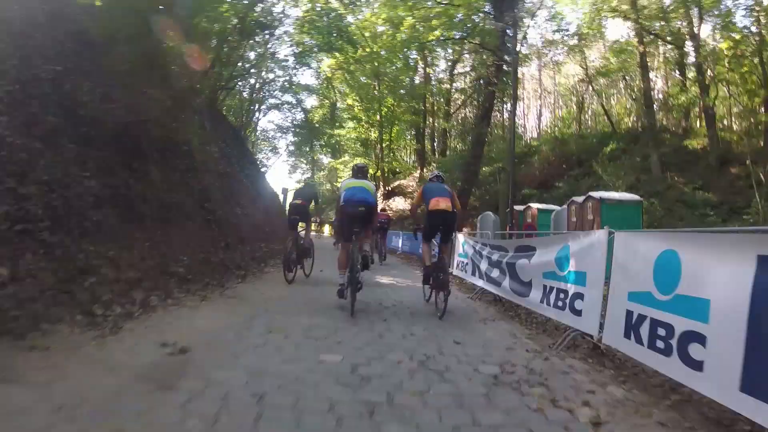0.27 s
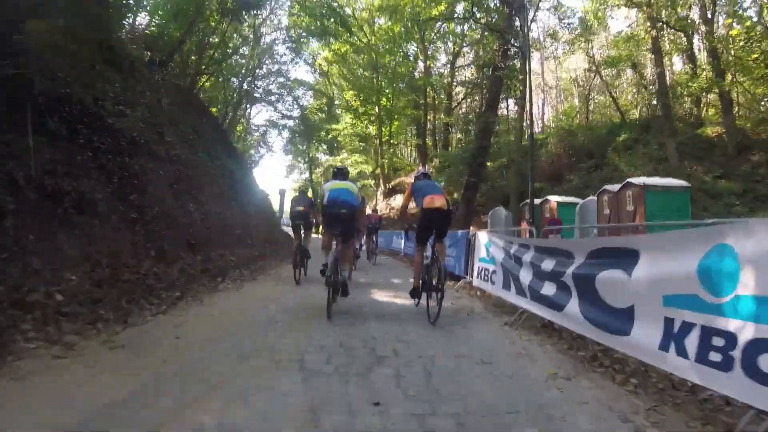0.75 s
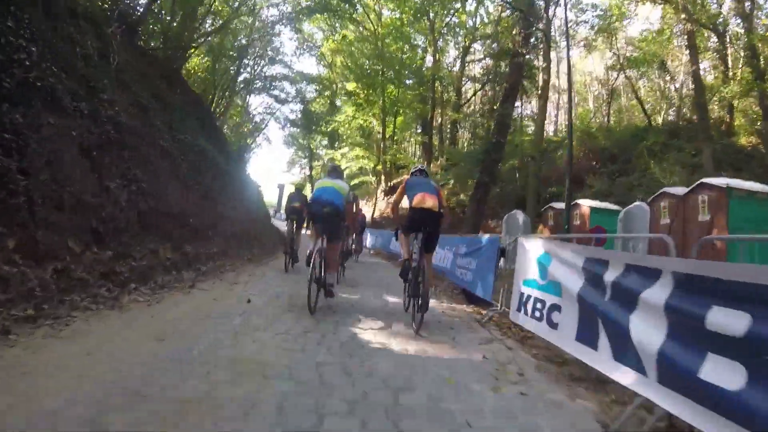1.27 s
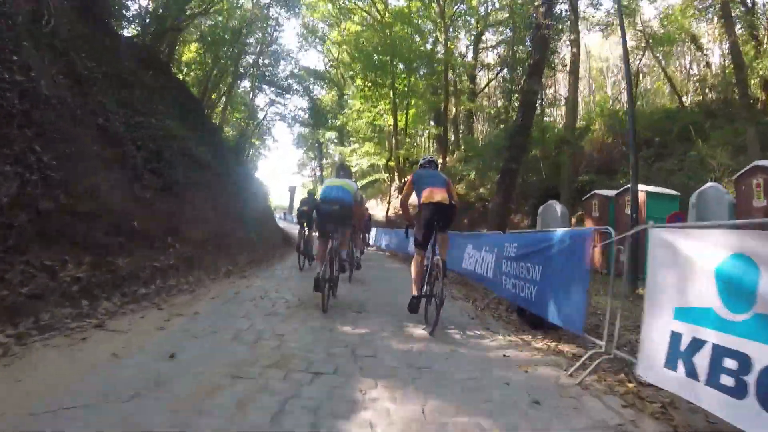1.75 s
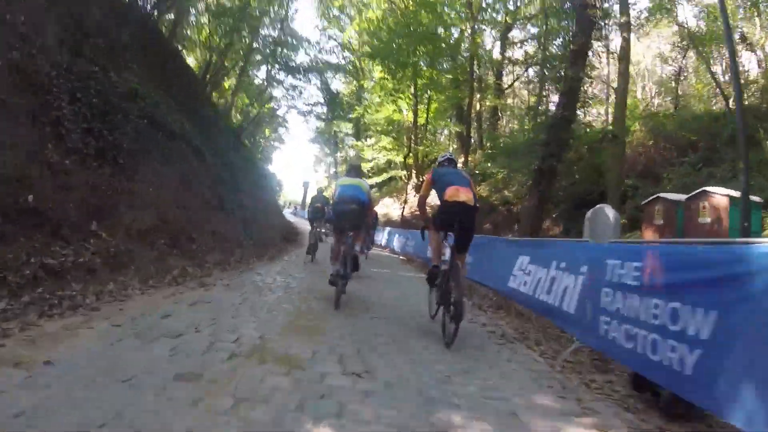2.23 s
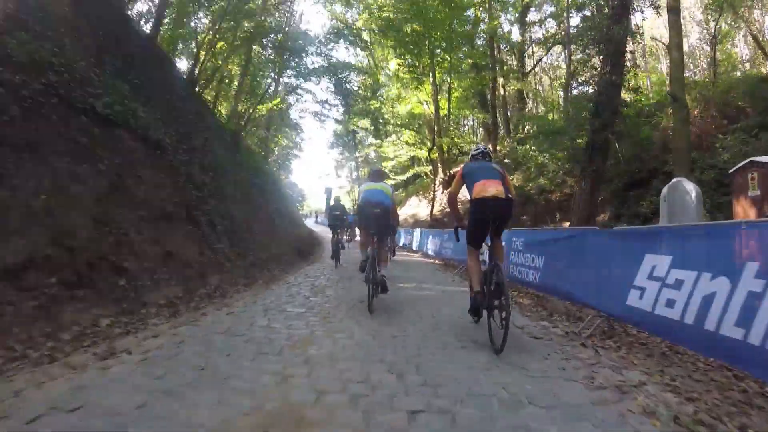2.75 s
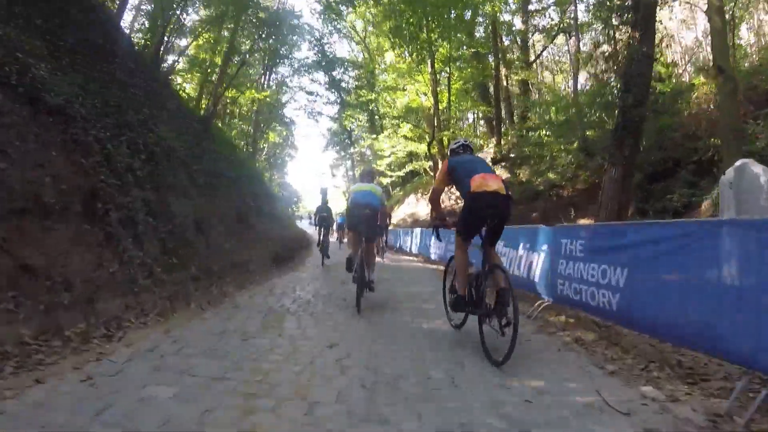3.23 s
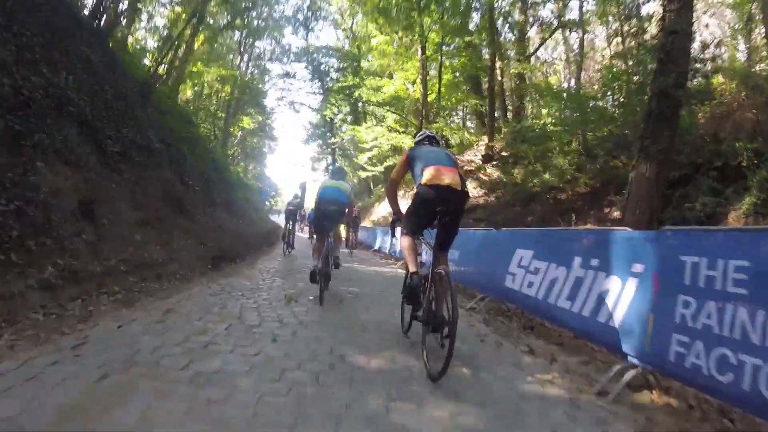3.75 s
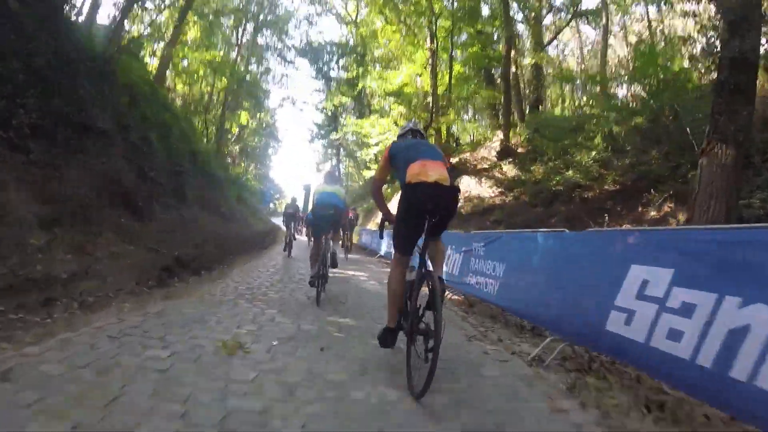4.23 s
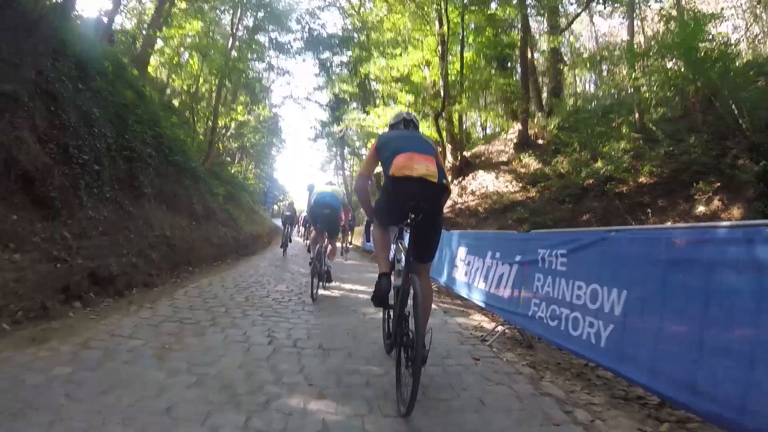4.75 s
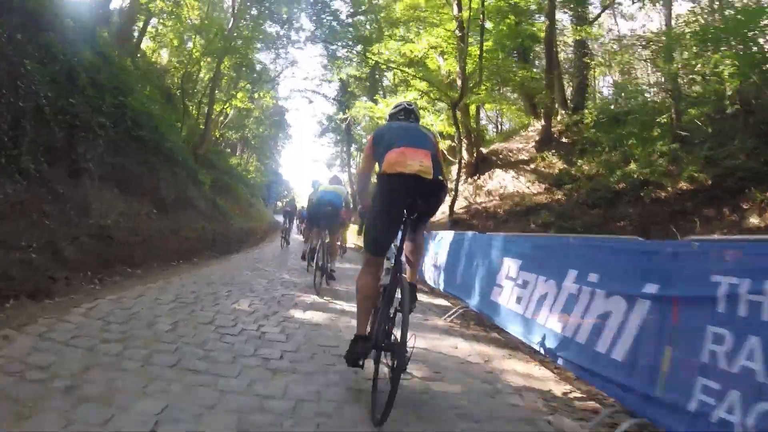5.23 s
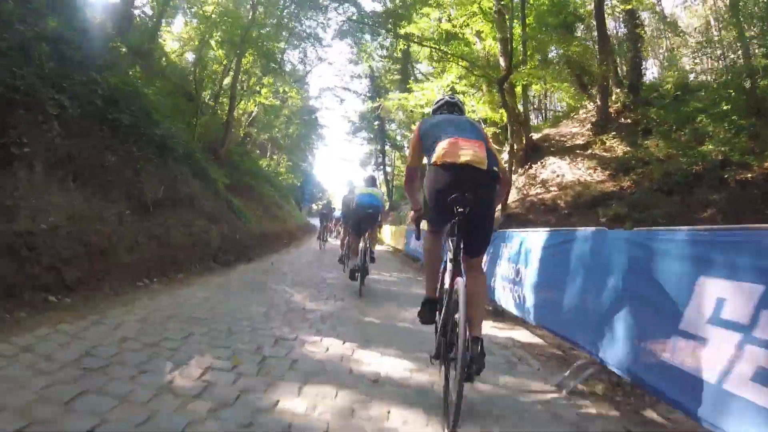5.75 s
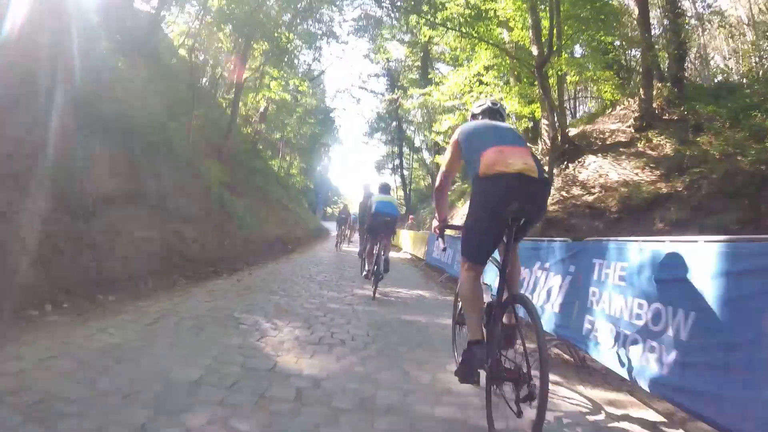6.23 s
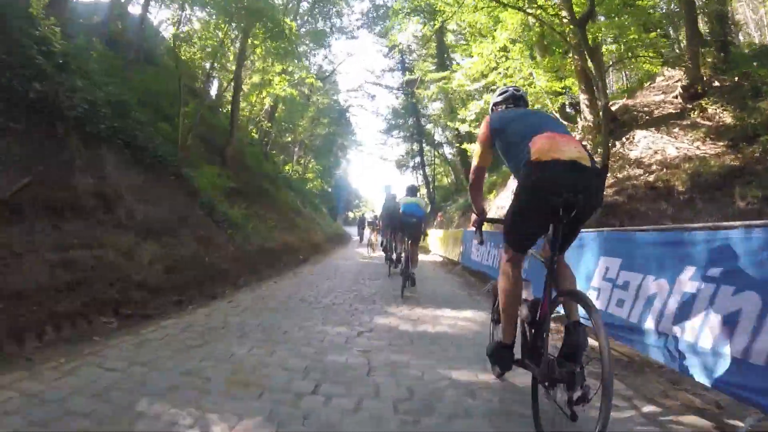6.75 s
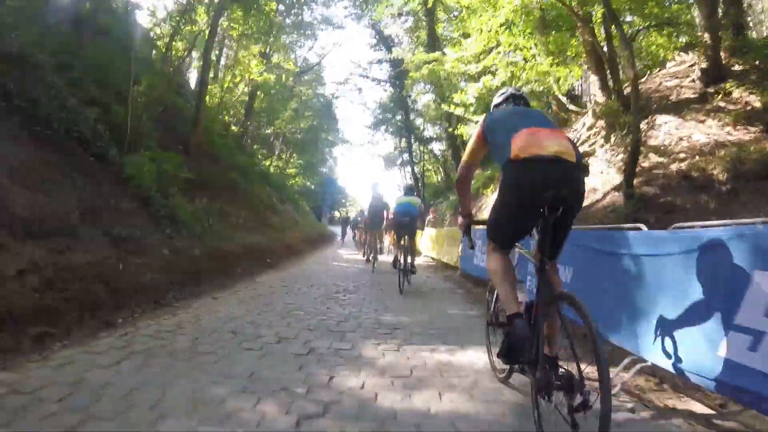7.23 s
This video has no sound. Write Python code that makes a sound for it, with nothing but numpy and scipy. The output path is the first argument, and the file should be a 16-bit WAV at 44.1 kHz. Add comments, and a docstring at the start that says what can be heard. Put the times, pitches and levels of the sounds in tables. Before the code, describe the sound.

Bicycle tyres roll continuously over uneven cobbles, heard from a small housed microphone clamped to the handlebar. Loud, boomy rumble and irregular thumps dominate as wheels drop into joints. Over it, the housing hums and knocks in its clamp, with dry rattling, faint bright metallic ticks and a soft muffled tyre hiss. Knocks bunch up around the middle and again near the end. Outdoors, very close, no voices.

```python
"""Bicycle on a cobbled lane

A bicycle climbs a cobbled lane; the microphone sits in a small housing clamped to the handlebar.
Stone edges jolt the wheels and shake fork and bar: random jolts ring low resonances.
The housing hums and knocks in its clamp: jolts, ticks and single blows ring higher resonances.
Small contacts rattle, bright jingles and ticks are showers of clicks; the tyres hiss as bands of noise."""
import sys
import numpy as np
from scipy import signal
from scipy.io import wavfile
from scipy.ndimage import uniform_filter1d

SR = 44100
rng = np.random.default_rng(int(sys.argv[2]) if len(sys.argv) > 2 else 0)


def wrap_up_sound(samples):
    """Save the sound to the file named by the first command line argument, as 16-bit audio."""
    columns = np.atleast_2d(samples).T
    # keep every value between -1 and 1, then stretch to whole-number steps
    tamed = np.clip(columns, -1, 1)
    steps = np.round(tamed * 32767).astype(np.int16)
    wavfile.write(sys.argv[1], SR, steps)


N = 329849   # length in samples

# How rough the paving is, given as the hum of the housing: t/s, level/dB
ROUGHNESS = [(0.05, -35.5), (0.32, -38), (0.67, -44), (0.83, -31), (1.04, -39), (1.93, -38.5),
             (2.01, -32.5), (2.77, -38.5), (3.43, -35), (4.2, -41.5), (4.28, -36.5), (4.45, -40.5),
             (5.46, -34.5), (5.5, -38.5), (6.18, -37), (7.46, -38.5)]
# Tyre hiss, how strong the noise is at each pitch, relative: f/Hz, level/dB per Hz
HISS_SPECTRUM = [(560, -9.5), (800, -15), (1300, -25), (1600, -26), (2100, -30), (3200, -31.5), (4100, -36),
                 (6300, -38), (9800, -42)]
# Resonance of the microphone port, heard in the hiss: f/Hz, width/Hz, level/dB
MICROPHONE_PORT = (5185, 1380, 0.93)
# Bright metallic jingles and short treble ticks: t/s, peak level/dB (nominal)
JINGLES = [(0.25, -47.5), (0.388, -46), (0.4, -40), (1.715, -47.5), (2.5718, -46), (2.911, -49.5),
           (2.963, -46), (3.29, -47), (4.217, -47.5), (4.301, -45.5), (4.771, -39), (4.873, -47.5),
           (5.017, -47), (5.158, -43), (5.3882, -48.5), (5.417, -45), (5.75, -44.5), (6.0128, -40.5),
           (6.183, -48), (6.249, -47.5), (6.53, -46), (6.866, -45.5), (6.9142, -45.5), (6.999, -41.5),
           (7.1123, -45), (7.3784, -46)]
# Louder knocks of the housing in its clamp: t/s, nominal ring peak level/dB, tick level over the ring/dB
KNOCKS = [(0.0405, -31, -10), (0.0553, -31, 7), (0.1512, -30, 6), (0.191, -35, 2), (0.252, -30, -2),
          (0.2421, -26, -2), (0.3168, -30.5, 4), (0.3855, -31, 0), (0.7786, -32, 0), (0.8001, -28, -2),
          (0.823, -33, -4), (0.85, -28, 1), (0.871, -33, -4), (0.944, -33, -4), (0.969, -34, 0),
          (0.8602, -26.5, -5.5), (1.0046, -29, 0), (1.066, -28.5, 1), (1.2354, -32, 2), (1.302, -35, 0),
          (1.359, -35, 0), (1.4357, -27, 6), (1.5284, -32, 5), (1.650, -35, 5), (1.753, -34, -3),
          (2.061, -31, -3), (2.109, -31, -2), (2.1392, -33, 3), (2.1958, -31, 2), (2.218, -34, 2),
          (2.251, -28, 2), (2.264, -33, -4), (2.372, -34, 6), (2.501, -34, -3), (2.56, -35, 2),
          (2.6472, -28, 3), (2.7396, -30.5, 5), (3.097, -35, -3), (3.362, -31, 0), (3.4128, -27, 0),
          (3.432, -31, 1), (3.485, -29, -2), (3.537, -34, -1), (3.5827, -24.5, 0.5), (3.6277, -25.5, 7),
          (3.68, -28, 7), (3.702, -27, 4), (3.723, -33, 2), (3.7464, -30, 5), (3.8003, -27, 0),
          (3.822, -35, 3), (3.858, -35, 0), (3.8939, -28.5, 4), (4.0006, -35, -2), (4.0542, -32, 4),
          (4.07, -32, 5), (4.2827, -29, 2), (4.498, -34, 13), (4.675, -32, 1), (4.740, -34, -3),
          (4.772, -33, 8), (4.972, -34, 0), (5.132, -30.5, 5), (5.1871, -29, 4), (5.3146, -33, 4),
          (5.324, -33, -5), (5.354, -34, 7), (5.388, -26.5, -2), (5.4241, -23, 0), (5.443, -32, 3),
          (5.892, -34, -3), (5.9498, -32, 9.5), (6.0028, -27, 5), (6.146, -23.5, 0), (6.2072, -25, 6),
          (6.222, -34, -4), (6.2826, -33, 3), (6.3375, -35, 3), (6.353, -35, 3), (6.371, -36, 0),
          (6.3939, -26.5, 1), (6.4303, -29, -1), (6.457, -34, 6), (6.505, -29, 7), (6.518, -32, 0),
          (6.554, -35, -3), (6.5928, -32, -2), (6.609, -34, 3), (6.6784, -34, -3), (6.767, -34, -3),
          (6.8563, -31, -2), (6.868, -32, -2), (6.8966, -29, -6), (6.916, -33, 2), (6.936, -35, -3),
          (6.957, -33, 1), (7.001, -32, 7), (7.021, -34, -5), (7.033, -33, -3), (7.1106, -31.5, 5),
          (7.3023, -30, -8), (7.3312, -24, -1), (7.3848, -28, 7)]
# Contacts within one knock, each lag later stretched by chance: lag t/s, level/dB
CHATTER = [(.0006, -4.5), (.003, -7), (.0065, -12.5)]
# Sharper edges set the housing humming: t/s, peak level/dB (nominal)
HOUSING_RAPS = [(0.252, -17.5), (0.801, -29), (0.859, -24.5), (1.982, -26), (2.076, -26), (2.169, -25),
                (2.526, -30), (2.671, -20), (3.368, -18.5), (3.416, -26), (3.566, -23.5), (4.133, -31),
                (4.257, -23.5), (4.295, -19), (5.168, -21.5), (5.387, -21), (6.136, -30), (6.455, -21),
                (6.512, -22), (6.9, -21), (7.337, -19)]
# Wheels drop into the deeper joints and the bar shudders: t/s, peak level/dB (nominal)
JOINT_THUMPS = [(0.193, -7), (0.254, -4), (0.693, -6), (0.861, -10), (0.954, -3.5), (1.087, -6),
                (1.438, -3), (1.716, -4.5), (1.875, -9), (1.99, -4), (2.046, -6), (2.266, -5), (2.376, -6),
                (2.627, -6), (2.835, -7.5), (3.202, -10.5), (3.303, -8), (3.632, -7.5), (4.085, -7.5),
                (4.215, -6), (4.297, -4), (4.365, -8.5), (4.956, -6), (5.062, -6), (5.135, -10.5),
                (5.389, -8.5), (5.444, -5), (5.762, -9), (5.842, -7.5), (6.059, -12.5), (6.093, -6.5),
                (6.163, -6), (6.22, -3), (6.454, -7.5), (6.522, -5), (6.996, -5), (7.111, -6), (7.316, -7),
                (7.407, -10)]
# Resonances of each part, levels relative to each other: f/Hz, width/Hz, level/dB
METAL_MODES = [(2660, 1630, 5), (4840, 790, 2), (6800, 280, -11), (9000, 890, -12)]
CLAMP_MODES = [(834, 230, 2), (1100, 120, 0), (1275, 274, 6), (1594, 120, -5.5), (1770, 330, -5.5),
               (2410, 570, -9.5)]
HOUSING_MODES = [(396.7, 81, -2.5), (502, 51, 2), (542.7, 69, -4.5)]
BAR_MODES = [(128.6, 14.7, -9), (153.6, 27.3, -3.5), (190.1, 24.6, -1), (224.4, 19.7, -5.5),
             (296, 84, -19.5)]
WHEEL_MODES = [(19.16, 18, -7.5), (31.31, 19.2, -3.5), (45.6, 23.2, -2), (57.3, 17.3, -2.5),
               (86.24, 44, -12.5)]

# Nominal levels on average paving (dB), and the share of the roughness swing that each follows
HISS_DB, HISS_FOLLOWS = -48.5, 0.32
RATTLE_DB, RATTLE_FOLLOWS = -53, 0.5
SHUDDER_DB, SHUDDER_FOLLOWS = -19, 0.3
BOUNCE_DB, BOUNCE_FOLLOWS = -12, 0.13
KNOCK_FOLLOWS = 0.67   # how far the chance of small knocks follows the roughness

HISS_EDGE_HZ = 11400
RATTLE_PER_S = 200   # contacts per second, before scaling by the shaking
RATTLE_LOW_HZ, RATTLE_HIGH_HZ = 734, 1840
RATTLE_WIDTH = 0.11   # resonance width as a share of its pitch
RATTLE_TILT_DB = -11.5   # highest pitch against lowest
JINGLE_S, RAP_S, THUMP_S = 0.0089, 0.0032, 0.0059   # jingle decay time; rise times of raps and thumps
SMALL_KNOCK_CHANCE = 0.7   # per wheel bounce, before scaling by the shaking
SMALL_KNOCK_DB, SMALL_TICK_DB = -48.5, 2   # smallest nominal ring peak; tick over an even ring
TICK_CUT_HZ = 2300
KNOCK_BODY_DB = -4.5   # a knock also rings the housing, this far below the clamp
CLAMP_SCATTER_DB, HOUSING_SCATTER_DB = 3.5, 6.0   # how unevenly a blow rings the resonances
SWING_LIMIT = 1   # largest swing let through, full scale
TOP_EDGE_HZ, CUTOFF_HZ = 9100, 15700
OFFSET = 0.0028   # constant shift, full scale
RUN_IN = SR // 5   # samples of ringing before the start


def from_db(db):
    """Turn decibels into a plain factor."""
    return 10 ** (np.asarray(db) / 20)


def rms_one(x):
    """Scale to an rms (average strength) of 1."""
    return x / np.sqrt(np.mean(x ** 2) + 1e-20)


def in_time(rows):
    """Draw straight lines between the table rows, one curve per column."""
    times, *columns = np.transpose(rows)
    return [np.interp(np.arange(N) / SR, times, column) for column in columns]


def butter(x, hz, kind, order=2):
    """Keep the low, high or middle pitches with a smooth filter."""
    return signal.sosfilt(signal.butter(order, hz, kind, fs=SR, output="sos"), x)


def drift(rate_hz):
    """Wander slowly by chance with spread 1: noise smoothed twice, worked out every 40 samples."""
    r = np.exp(-80 * np.pi * rate_hz / SR)
    noise = rng.standard_normal(N // 40 + 2002)
    slow = signal.lfilter([1], [1, -2 * r, r * r], noise)[2000:]
    return np.interp(np.arange(N) / 40, np.arange(len(slow)), rms_one(slow))


def resonance(x, hz, width_hz):
    """Ring at one pitch (two poles, gain 1 on top); a narrow width rings longer."""
    r = np.exp(-np.pi * width_hz / SR)
    top = [(1 - r * r) / 2, 0, (r * r - 1) / 2]
    bottom = [1, -2 * r * np.cos(2 * np.pi * hz / SR), r * r]
    return signal.lfilter(top, bottom, x + 1e-18)


def grains(per_s, spread_db):
    """Make random clicks of uneven size and sign, like many tiny impacts."""
    size_db = spread_db * np.minimum(rng.exponential(1, N), 5)
    sizes = from_db(size_db) * rng.choice([-1, 1], N)
    return sizes * (rng.random(N) < per_s / SR)


def shaken(modes, per_s, spread_db, even_s):
    """Jolts pass twice through each resonance of a body; the level is evened over even_s; rms 1."""
    jolts = grains(per_s, spread_db)
    jolts = np.r_[jolts[-RUN_IN:], jolts]   # already ringing at the first sample
    body = 0
    for k, (hz, width_hz, db) in enumerate(modes):
        # two wider passes come out about as narrow as the table's width
        once = resonance(jolts, hz, 1.5 * width_hz)
        twice = resonance(once, hz, 1.5 * width_hz)
        body = body + (-1) ** k * from_db(db) * rms_one(twice)[RUN_IN:]
    size = int(even_s * SR)
    power = uniform_filter1d(uniform_filter1d(rms_one(body) ** 2, size), size)
    return rms_one(body / np.sqrt(power + 0.22))


def struck(at, level_db, modes, scatter_db):
    """Every blow rings each resonance with its own strength; a 0 dB blow on a 0 dB mode peaks near 1."""
    scatter = scatter_db * rng.standard_normal((len(at), len(modes)))
    share = from_db(2 * np.transpose(modes)[2])
    power = from_db(2 * scatter) @ share / share.sum()
    scatter = scatter - 10 * np.log10(power)[:, None]   # the blow keeps its total power
    out = 0
    for k, (hz, width_hz, db) in enumerate(modes):
        clicks = np.zeros(N)
        clicks[at] = from_db(level_db + db + scatter[:, k]) * SR / (2 * np.pi * width_hz)
        out = out + (-1) ** k * resonance(clicks, hz, width_hz)
    return out


def swells(rows, rise_s):
    """Each blow is a swell that rises and dies; returns the rms envelope."""
    times, db = np.transpose(rows)
    t = np.arange(int(.1 * SR)) / SR / rise_s
    blows = np.zeros(N)
    blows[np.round(times * SR).astype(int)] = from_db(db) / np.sqrt(2)   # peak to rms
    return signal.fftconvolve(blows, t * np.exp(1 - t))[:N]


def tyre_hiss(shake, patchy_db):
    """Quarter-octave bands of gritty noise that flicker and swell a little with the shaking; rms 1."""
    together = drift(60)
    edges = 500 * 2 ** np.arange(0, 4.8, 1 / 4)
    grit = [rms_one(grains(6000, spread_db=3.5)), rms_one(grains(6000, spread_db=4.5))]
    table_hz, table_db = np.transpose(HISS_SPECTRUM)
    hiss = 0
    for k, (low, high) in enumerate(zip(edges, edges[1:])):
        level_db = np.interp(np.log(low * high) / 2, np.log(table_hz), table_db)
        flicker_db = patchy_db * (together + 0.6 * drift(25))   # shared part and the band's own
        hiss = hiss + from_db(level_db + flicker_db) * butter(grit[k % 2], [low, high], "band")
    hiss = butter(hiss, HISS_EDGE_HZ, "low", order=8)
    hz, width_hz, db = MICROPHONE_PORT
    port = from_db(db) * butter(hiss, [hz - width_hz / 2, hz + width_hz / 2], "band")
    return rms_one(shake ** .2 * (hiss + port))


def rattle(shake):
    """Small uneven contacts, more when the bar shakes; each rings briefly at one of 12 pitches; rms 1."""
    contacts = grains(RATTLE_PER_S * shake, spread_db=3.5)
    dealt = rng.integers(0, 12, N)   # which pitch each contact gets
    pitches = np.geomspace(RATTLE_LOW_HZ, RATTLE_HIGH_HZ, 12)
    tilt_db = np.linspace(0, RATTLE_TILT_DB, 12)
    out = 0
    for k, (hz, db) in enumerate(zip(pitches, tilt_db)):
        ring = resonance(contacts * (dealt == k), hz, RATTLE_WIDTH * hz)
        out = out + from_db(db) * rms_one(ring)
    return rms_one(out)


def jingles():
    """Bright jingles and short treble ticks: showers of clicks ring metallic resonances and die away."""
    t = np.arange(int(.05 * SR)) / SR
    fade = np.minimum(t / 0.0003, 1) * np.exp(-t / JINGLE_S)
    shower = np.zeros(N)
    for start_s, db in JINGLES:
        part = shower[round(start_s * SR):][:len(t)]
        part += from_db(db) * fade[:len(part)]   # also fills the shower
    contacts = grains(2800, spread_db=-1.0)
    metal = sum(from_db(db) * rms_one(resonance(contacts, hz, width_hz)) for hz, width_hz, db in METAL_MODES)
    return shower * rms_one(metal)


def knocks(shake, wheels):
    """A tick, then clamp and housing ring and chatter; small knocks come at the tops of wheel bounces."""
    times, ring_db, tick_db = np.transpose(KNOCKS)
    tops = np.flatnonzero((wheels[1:-1] > wheels[:-2]) & (wheels[1:-1] > wheels[2:]))
    chance, size = rng.random(N), rng.exponential(1, N)
    small = tops[chance[tops] < SMALL_KNOCK_CHANCE * shake[tops]]   # likelier where the bar shudders
    uneven_db = 3 * np.minimum(size[small], 2)
    at = np.r_[np.round(times * SR).astype(int), small]
    ring_db = np.r_[ring_db, SMALL_KNOCK_DB + uneven_db]
    tick_db = np.r_[tick_db, np.full(len(small), SMALL_TICK_DB)]

    ticks = np.zeros(N)
    # scaled to peak near 1 at 0 dB after the low-pass
    ticks[at] = from_db(ring_db + tick_db) * SR / (2 * np.pi * TICK_CUT_HZ)
    ticks = butter(butter(ticks, TICK_CUT_HZ, "low", order=1), 900, "high")

    ring, stretch = 0, rng.uniform(0.7, 1.5, (len(at), 3))
    for k, (lag_s, db) in enumerate(CHATTER):
        late = np.minimum(at + (lag_s * stretch[:, k] * SR).astype(int), N - 1)
        clamp = struck(late, ring_db + db, CLAMP_MODES, CLAMP_SCATTER_DB)
        housing = struck(late, ring_db + db + KNOCK_BODY_DB, HOUSING_MODES, HOUSING_SCATTER_DB)
        ring = ring + clamp + housing
    return ticks + butter(ring, [400, 2600], "band")


def housing_hum(hum_db, shake):
    """Jolts ring the housing; the hum follows paving and shaking, and sharper edges make it swell."""
    level = np.hypot(swells(HOUSING_RAPS, RAP_S), from_db(hum_db) * shake ** 0.5)
    return level * shaken(HOUSING_MODES, per_s=280, spread_db=2.5, even_s=0.015)


def bar_shudder(rough_db):
    """Jolts ring fork and bar; an uneven steady shudder joins the swells at the deeper joints."""
    steady_bar = shaken(BAR_MODES, per_s=400, spread_db=2.5, even_s=.012)
    lumps_db = 3.6 * drift(16)
    shudder = from_db(SHUDDER_DB + SHUDDER_FOLLOWS * rough_db + lumps_db)
    return np.hypot(swells(JOINT_THUMPS, THUMP_S), shudder) * steady_bar


def shaking_strength(bar):
    """How hard the bar moves just now, relative to its average: a short running rms."""
    return np.sqrt(uniform_filter1d(rms_one(bar) ** 2, int(0.014 * SR)) + 0.033)


def wheel_bounce(rough_db, shake):
    """Jolts ring the wheels' lowest resonances, a little harder when the bar shakes."""
    level = shake ** 0.27 * from_db(BOUNCE_DB + BOUNCE_FOLLOWS * rough_db)
    return level * shaken(WHEEL_MODES, per_s=140, spread_db=3.0, even_s=0.054)


def limited_swing(motion):
    """Round off the largest low swings, then keep only the low pitches."""
    swing = SWING_LIMIT * np.tanh(motion / SWING_LIMIT)
    return butter(swing, 357, "low", order=4)


def scene():
    """Shake the bar first, let the other sounds follow it, then add them up."""
    hum_db, = in_time(ROUGHNESS)
    rough_db = hum_db - hum_db.mean()
    bar = bar_shudder(rough_db)
    shake = shaking_strength(bar)
    wheels = wheel_bounce(rough_db, shake)

    hiss = from_db(HISS_DB + HISS_FOLLOWS * rough_db) * tyre_hiss(shake, patchy_db=1.3)
    rattling = from_db(RATTLE_DB + RATTLE_FOLLOWS * rough_db) * rattle(shake)
    knocking = knocks(shake * from_db(KNOCK_FOLLOWS * rough_db), wheels)
    treble = butter(hiss + rattling + jingles() + knocking, TOP_EDGE_HZ, "low", order=3)

    swing = limited_swing(wheels + bar)
    return (treble + housing_hum(hum_db, shake) + swing)[None]


def record(dry):
    """Add a small constant offset and cut the top steeply."""
    return signal.sosfilt(signal.cheby2(12, 70, CUTOFF_HZ, fs=SR, output="sos"), dry + OFFSET)


dry = scene()
out = record(dry)
wrap_up_sound(out)
```